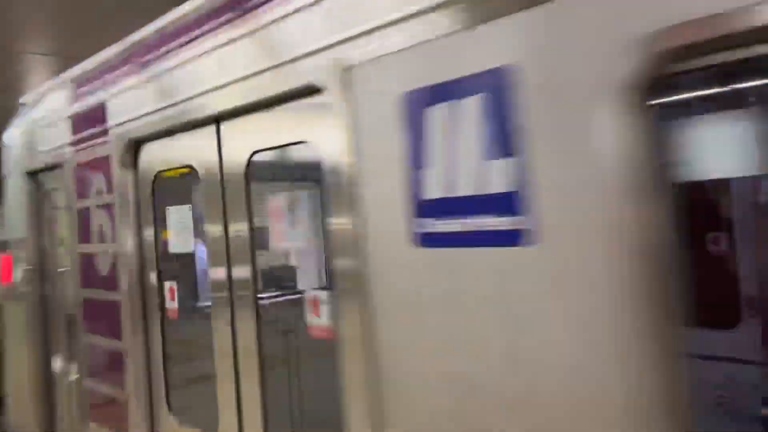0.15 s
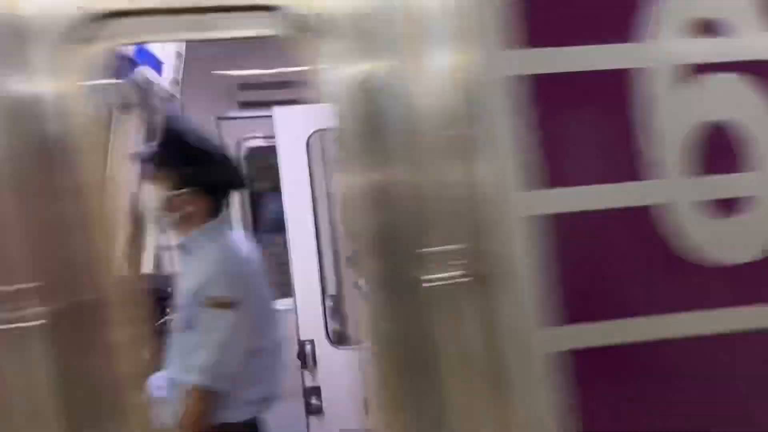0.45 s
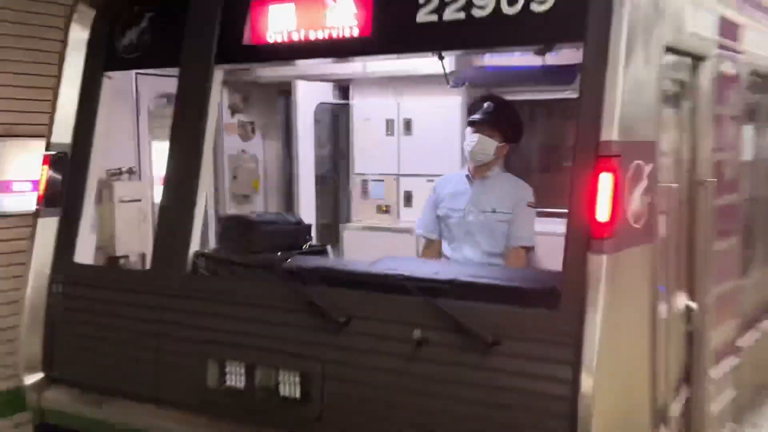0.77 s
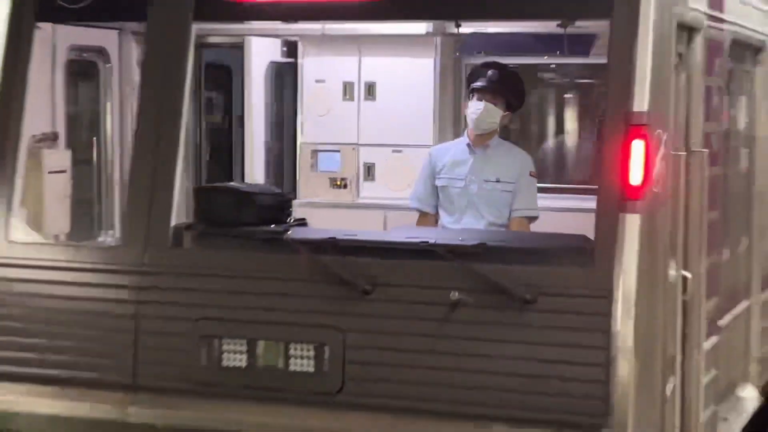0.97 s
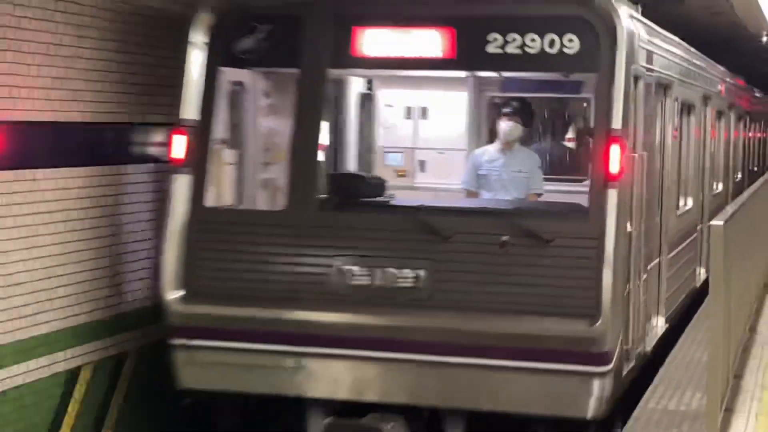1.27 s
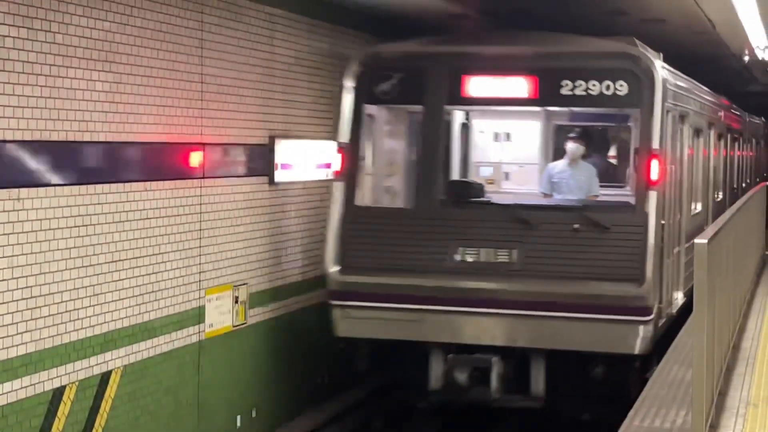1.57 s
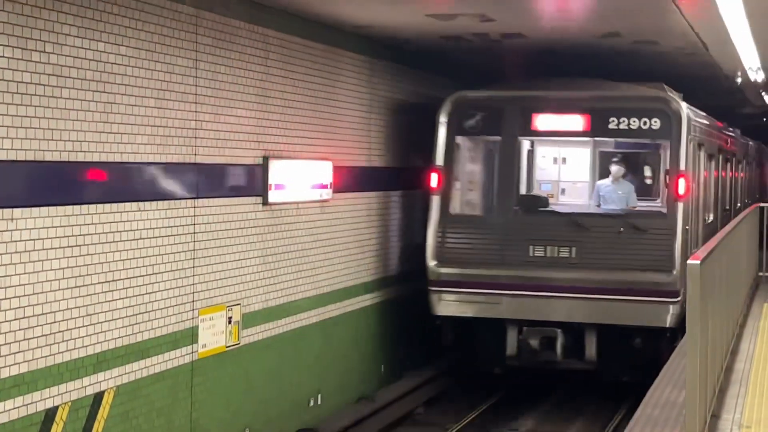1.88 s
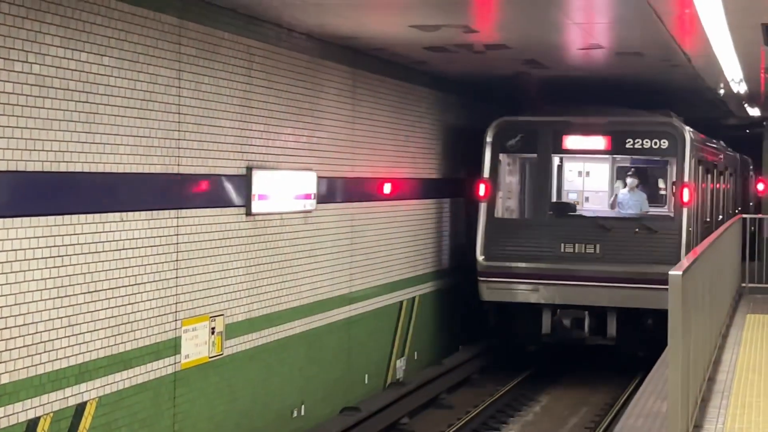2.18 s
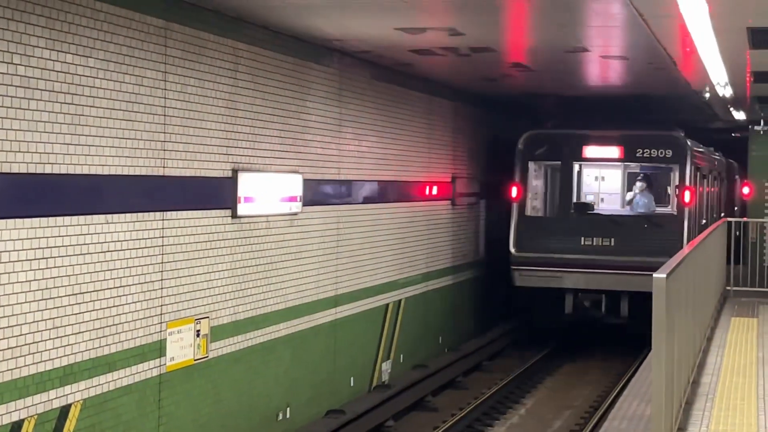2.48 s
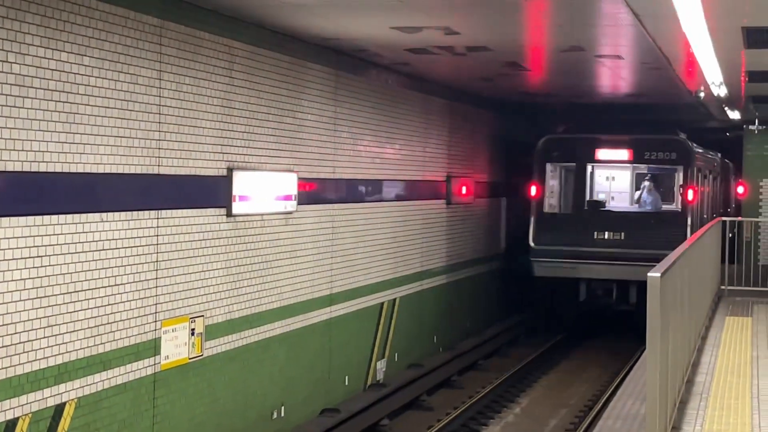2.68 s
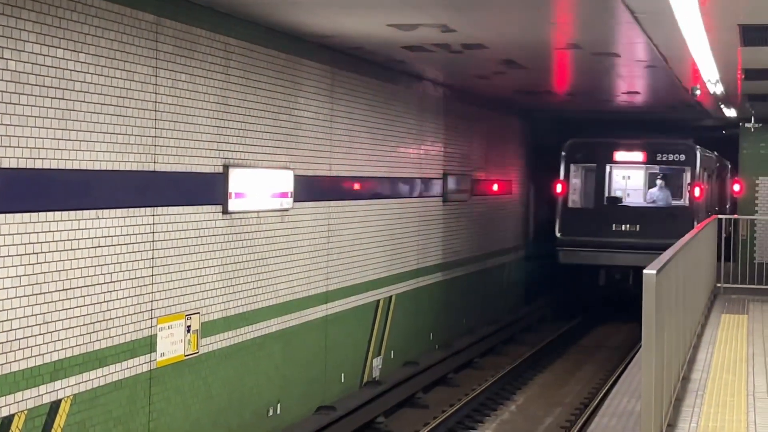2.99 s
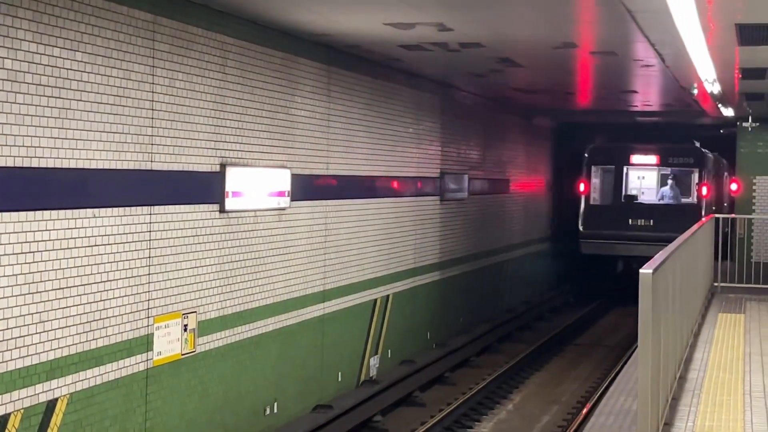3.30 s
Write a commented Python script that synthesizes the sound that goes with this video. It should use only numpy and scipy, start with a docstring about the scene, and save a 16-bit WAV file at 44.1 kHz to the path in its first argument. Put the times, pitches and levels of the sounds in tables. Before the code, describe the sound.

A subway train roars past close by, then recedes into a tunnel as wind buffets the microphone.

```python
"""A wide roar opens the scene: the last car of a subway train rolls past close by in a tiled station.
As it recedes into the tunnel the roar, coloured noise in four registers, narrows and dulls.
Noise-fed resonances make wheels and rails ring, hum and whine in swells, some bending in pitch.
The air dragged behind the train arrives last: bursts of low noise buffet the microphone, with one knock."""
import sys
import numpy as np
from scipy import signal
from scipy.fft import rfft, irfft, next_fast_len
from scipy.io import wavfile
from scipy.ndimage import uniform_filter1d

SR = 44100
rng = np.random.default_rng(int(sys.argv[2]) if len(sys.argv) > 2 else 0)


def bounce(signal):
    """Save signal as a 16-bit WAV file at the path given by the first command-line argument."""
    frames = np.transpose(np.atleast_2d(signal))
    limited = np.clip(frames, -1, 1)
    pcm = np.round(limited * 32767).astype(np.int16)
    wavfile.write(sys.argv[1], SR, pcm)


N = 152145

# Correlation of wind noise at the two ports. Each row: frequency in Hz, left-right likeness (1 = identical).
WIND_LIKENESS = [(55, 1), (130, 0.85), (300, 0.49), (700, 0.61)]
# Gusts of the slipstream, before the trim in scene().
# Each row: middle in seconds, bell spread in seconds, level in dB, lower edge in Hz, upper edge in Hz.
GUSTS = [(1.902, 0.071, -29.5, 54, 140), (2.113, 0.019, -22, 54, 119), (2.187, 0.016, -14, 45.4, 72),
         (2.238, 0.019, -21.5, 54, 100), (2.52, 0.059, -25, 54, 94.5), (2.6, .016, -19.5, 54, 110),
         (2.639, 0.0081, -14.5, 54, 170), (2.688, 0.0074, -22, 54, 90), (2.727, 0.011, -23.5, 54, 90),
         (2.797, 0.018, -12.5, 50, 93), (2.849, 0.012, -12.5, 54, 160), (2.91, 0.0042, -13.5, 160, 260),
         (2.922, 0.0075, -10, 50, 110), (2.95, 0.0085, -14, 60, 160), (2.965, 0.0042, -19, 170, 310),
         (3.002, 0.0051, -7.5, 70, 250), (3.018, .015, -11, 52, 95), (3.063, 0.0089, -17.5, 170, 300),
         (3.079, 0.015, -11.5, 52, 98), (3.107, 0.0074, -18, 130, 320), (3.124, 0.0092, -15, 60, 140),
         (3.142, .007, -16, 160, 327), (3.183, 0.011, -12, 90, 310), (3.207, 0.0095, -16, 60, 210),
         (3.228, 0.015, -23, 54, 150), (3.278, 0.0094, -20, 180, 340), (3.314, .007, -23, 54, 160),
         (3.38, 0.0075, -23.5, 190, 320), (3.043, .12, -17, 52, 84)]
# Resonances of the knock among the gusts. Each row: frequency in Hz, width in Hz, level in dB.
KNOCK_RESONANCES = [(715, 170, -20.5), (1250, 330, -33)]
# Hollow hum of the wheels; this and the next three tables hold before the trim in scene().
# Each row: time in seconds, frequency in Hz, level in dB.
HUM = [(.8, 759.8, -31), (.9, 789.6, -41), (.99, 806.2, -27.5), (1.12, 769.8, -32), (1.24, 789.7, -23.5),
       (1.35, 765.1, -25.5), (1.51, 780, -27), (1.63, 789.8, -34), (1.85, 820, -30), (2, 815.2, -33.5),
       (2.12, 779.8, -27.5), (2.25, 795, -24.5), (2.38, 789.7, -28), (2.51, 790.3, -32.5),
       (2.59, 765, -27.5), (2.73, 764.9, -27.5), (2.86, 780.1, -36), (3.25, 730, -33.5), (3.43, 790.2, -33)]
# A resonance arching above the hum. Each row: time in seconds, frequency in Hz, level in dB.
ARCH = [(1.42, 930, -37), (1.52, 985.4, -30.5), (1.63, 1009, -28.5), (1.76, 985, -29), (1.88, 980.5, -30),
        (2.03, 948, -37)]
# A fainter arch, an octave higher. Each row: time in seconds, frequency in Hz, level in dB.
HIGH_ARCH = [(1.23, 1970, -39), (1.43, 2178, -41), (1.6, 2064, -39), (1.68, 1853, -34.5), (1.78, 1750, -46)]
# Whine of the wheels entering the tunnel, upper partial.
# Each row: time in seconds, frequency in Hz, level in dB.
WHINE = [(2.58, 2352, -43), (2.7, 2279, -46), (2.81, 2158, -36.5), (2.93, 2125, -42.5), (3.06, 2160, -36),
         (3.16, 2200, -42), (3.28, 2282, -43), (3.43, 2332, -48)]
# Swells of wheel and rail ringing, before the trim in scene().
# Each row: middle in seconds, bell spread in seconds, frequency in Hz, width in Hz, level in dB.
RINGS = [(0.39, 0.12, 115, 16, -27), (0.7, 0.23, 262, 55, -31), (0.99, 0.2, 212.4, 12, -27),
         (1.7, 0.66, 213.5, 18.6, -32.5), (1.29, 0.038, 720, 41, -24.5), (1.42, 0.044, 715, 35, -28),
         (1.73, .04, 740, 42, -29), (1.89, .035, 835, 60, -26.5), (2.258, 0.013, 795, 40, -22),
         (2.11, 0.11, 635, 21, -31), (3.02, 0.038, 700, 34, -31.5), (3.17, .06, 645, 24, -28.5),
         (3.24, 0.17, 684, 120, -34), (0.49, 0.14, 1300, 51, -39), (2.094, 0.042, 2180, 120, -39),
         (2.19, 0.05, 1700, 80, -38), (1.46, 1.6, 2690, 44, -48.5), (0.41, .45, 4740, 260, -53),
         (1.3, 0.57, 4740, 110, -55), (3.1, 0.55, 4900, 300, -57.5), (3, 0.34, 3520, 490, -49)]
# Roar of the car alongside, before the changes in RECEDING. Each row: frequency in Hz, dB per octave.
ALONGSIDE = [(22, -64), (38, -41), (58, -28.5), (112, -24.5), (160, -27), (255, -25.5), (390, -28.5),
             (560, -27), (640, -25), (860, -23), (1130, -31), (1550, -30), (1900, -35), (2800, -35),
             (4600, -41), (5800, -45.5), (7200, -44.5), (9800, -53), (11700, -52.5), (14000, -60)]
# Roar of the wheels from down the track, likewise. Each row: frequency in Hz, dB per octave.
DOWN_TRACK = [(22, -69), (38, -39), (58, -28.5), (115, -26.5), (165, -30.5), (300, -29), (390, -29.5),
              (570, -29), (660, -24.5), (820, -25), (1000, -29), (1220, -34.5), (1550, -31), (2150, -32),
              (3100, -36), (4300, -42.5), (4900, -43), (5700, -46), (7300, -43.5), (9800, -52),
              (11700, -53.5), (14000, -57.5)]
# Change of the roar as the train recedes.
# Each row: time in seconds, then rumble, body, clatter and hiss in dB.
RECEDING = [(0, -1, 0, 0, -1), (.35, -1, 0.5, 0, 0), (.7, 1, 1, .5, 1), (1.05, 1, 2.5, -0.5, 0),
            (1.5, -2, 0, -1, -0.5), (1.95, 0, -1, -2, -2.5), (2.25, -2, -0.5, -2.5, -3),
            (2.4, -2, -2.5, -4, -5), (2.7, 0, -1.5, -3.5, -5.5), (3.05, 1, -5.5, -7, -7),
            (3.45, -4, -4.5, -7.5, -9)]
# Centres of those four registers: frequencies in Hz.
REGISTERS_HZ = [150, 600, 1800, 6000]
# Stereo image at the microphone pair. Each row: frequency in Hz, likeness alongside, likeness down the
# track, left-minus-right level in dB alongside, left-minus-right level in dB down the track.
IMAGE = [(55, 0.95, 0.98, 1, 1), (130, 0.96, 0.94, 0, 0), (336, 0.83, 0.9, 0.5, .5),
         (640, 0.26, 0.65, -0.5, 0.5), (1220, 0.33, 0.48, -1, 1), (1600, 0.22, 0.56, 0.5, -6),
         (2240, 0.35, 0.89, 2.5, -2.5), (4300, 0.35, 1, 3.5, -0.5), (6030, 0.2, 0.89, 0.5, 0.5),
         (7240, 1, 1, 1, 0), (8500, .99, 1, 3, 2.5), (10500, 1, 1, 0, -0.5), (14000, 0.99, 0.96, 0, 0)]
# Phase between the two ports. Each row: frequency in Hz, lead of the left in radians.
PORT_PHASE = [(20, 0), (1150, 0), (1350, -.9), (1550, -3.1), (1800, -5.8), (2600, -6.28), (4800, -6.28),
              (6500, -7.2), (7300, -7.9), (8100, -9.2), (8900, -9.6), (10200, -11), (11500, -12.3),
              (13000, -13.1), (14200, -14.6)]

WIND_SLOPE, WIND_SMOOTH_S = 3.17, .016  # steepness above the upper edge; span over which level holds
KNOCK_S, KNOCK_SPREAD_S = 3.022, 0.0042
WHINE_LOW_RATIO, WHINE_LOW_DB = .638, -1.5  # lower partial relative to the upper
GLIDE_FADE_S, GLIDE_STEADY_S = 0.052, .07  # bell spread of the end fades; span over which level holds
TAIL_PASSES_S, HANDOVER_S = 0.807, 0.077  # the end of the train goes by; time scale of the change
FENCE_ECHO_S, FENCE_ECHO_DB = 0.00136, -25.5  # reflection off the platform fence
WALL_ECHO_S, WALL_ECHO_DB = 0.0076, -9.5  # decay time and level of scatter, before its filter
FLUTTER_HZ, FLUTTER_DB, JOLT_DB = 18, .5, 0.24  # unevenness: rate; spread per register; shared spread

T = np.arange(N) / SR
SIZE = next_fast_len(N, True)
HZ = np.maximum(np.arange(SIZE // 2 + 1) * SR / SIZE, 1)


def from_db(db):
    """The decibel law: 20 dB is a tenfold amplitude."""
    return 10 ** (np.asarray(db) / 20)


def over_log_hz(hz, values):
    """Interpolation over log frequency, where equal ratios are equal steps."""
    return np.interp(np.log(HZ), np.log(hz), values)


def over_hz(points, axis=1):
    """One table column spread over log frequency."""
    table = np.array(points)
    return over_log_hz(table[:, 0], table[:, axis])


def to_time(spectrum):
    """Inverse Fourier transform: a spectrum becomes samples."""
    return irfft(spectrum, SIZE)[..., :N]


def noise_pair(likeness, pan_db=0, phase=0):
    """Mid-side mixing: the share of common noise sets the likeness of two channels."""
    mid, side = rfft(rng.standard_normal((2, SIZE)))
    alike = np.clip(likeness, -.995, .995)
    sign = np.array([[1], [-1]])  # left, right
    pair = np.sqrt((1 + alike) / 2) * mid + sign * np.sqrt((1 - alike) / 2) * side
    return pair * from_db(sign * pan_db / 2) * np.exp(1j * sign * phase / 2)


def track_noise():
    """Directional cues: white noise with the image of a source down the track."""
    return noise_pair(over_hz(IMAGE, axis=2), over_hz(IMAGE, axis=4), over_hz(PORT_PHASE))


def evened(x, span_s):
    """Level normalization: rms is held near 1 over a span while faster flutter survives."""
    power = uniform_filter1d(np.mean(x ** 2, axis=0), max(int(span_s * SR), 1))
    return x / np.sqrt(np.maximum(power, 0) + 1e-20)


def swell(middle_s, spread_s):
    """Gaussian envelope: a bell-shaped rise and fall."""
    return np.exp(-.5 * np.minimum(((T - middle_s) / spread_s) ** 2, 100))


def ringing_noise(hz, width_hz):
    """Forced resonance: noise keeps a narrow mode sounding, at rms near 1."""
    resonance = 1 / (1 + 1j * (HZ - hz) / width_hz * np.sqrt(2)) ** 2
    return evened(to_time(track_noise() * resonance), span_s=0.18)


def slipstream():
    """Turbulent pressure: long lumps of air rumble, big ones thud, small ones knock higher in pitch."""
    out = 0
    likeness = over_hz(WIND_LIKENESS)
    for middle_s, spread_s, db, low_hz, edge_hz in GUSTS:
        below = 1 + (low_hz / HZ) ** 8
        above = 1 + (HZ / edge_hz) ** (2 * WIND_SLOPE)
        colour = 1 / np.sqrt(below * above)
        lumps = evened(to_time(noise_pair(likeness) * colour), span_s=WIND_SMOOTH_S)
        out = out + from_db(db) * swell(middle_s, spread_s) * lumps
    return out


def knock():
    """Broad resonances under a brief envelope: one short dull knock."""
    body = sum(from_db(db) * ringing_noise(hz, width_hz) for hz, width_hz, db in KNOCK_RESONANCES)
    return swell(KNOCK_S, KNOCK_SPREAD_S) * body


def gliding(curve, width_hz, ratio=1):
    """Frequency shifting: a noise-fed resonance follows a pitch and level curve and fades past its ends."""
    s, hz, db = np.transpose(curve)
    centre_hz = ratio * hz.mean()
    shift_hz = ratio * np.interp(T, s, hz) - centre_hz
    turn = 2 * np.pi * np.cumsum(shift_hz) / SR
    analytic = signal.hilbert(ringing_noise(centre_hz, width_hz), SIZE)[:, :N]
    ring = (analytic * np.exp(1j * turn)).real
    end_fades = swell(np.clip(T, s[0], s[-1]), GLIDE_FADE_S)  # 1 within the curve
    return from_db(np.interp(T, s, db)) * end_fades * evened(ring, span_s=GLIDE_STEADY_S)


def wheel_singing():
    """Gliding resonance: the wheels' hollow hum, the arches above it and a late whine of two partials."""
    upper = gliding(WHINE, width_hz=120)
    lower = from_db(WHINE_LOW_DB) * gliding(WHINE, width_hz=49, ratio=WHINE_LOW_RATIO)
    arches = gliding(ARCH, width_hz=75) + gliding(HIGH_ARCH, width_hz=130)
    return gliding(HUM, width_hz=52.5) + arches + upper + lower


def wheel_ringing():
    """Roughness excitation: rail roughness drives narrow wheel and rail modes that swell and die away."""
    out = 0
    for middle_s, spread_s, hz, width_hz, db in RINGS:
        out = out + from_db(db) * swell(middle_s, spread_s) * ringing_noise(hz, width_hz)
    return out


def per_octave(points):
    """Constant-ratio bands: the gain that gives white noise these octave levels."""
    return from_db(over_hz(points)) * np.sqrt(SR / 2 / HZ / np.log(2))


def drift(rate_hz):
    """Low-passed noise: a slow random wander with standard deviation 1."""
    slow = to_time(rfft(rng.standard_normal(SIZE)) * HZ / (HZ + 2) / (1 + (HZ / rate_hz) ** 2))
    return slow / slow.std()


def walls():
    """Early reflection: direct sound plus dense midrange scatter off tiled walls, at mean power near 1."""
    decay = np.exp(-np.minimum(T / WALL_ECHO_S, 50))
    scatter = rng.standard_normal(N) * decay * (T > .003)
    gain = from_db(WALL_ECHO_DB) * HZ / (HZ + 900) / (1 + (HZ / 4500) ** 2)
    response = 1 + gain * rfft(scatter / np.linalg.norm(scatter), SIZE)
    return response / np.sqrt(1 + gain ** 2)


def fence():
    """Comb filtering: a faint, dulled, delayed copy from the platform fence joins the direct sound."""
    delay = np.exp(-2j * np.pi * HZ * FENCE_ECHO_S)
    return 1 + from_db(FENCE_ECHO_DB) * delay / (1 + (HZ / 4000) ** 2)


def rolling_roar():
    """Equal-power crossfade: a wide roar alongside yields to a narrower one down the track that dulls."""
    near_noise = noise_pair(over_hz(IMAGE, axis=1), over_hz(IMAGE, axis=3), over_hz(PORT_PHASE))
    near = per_octave(ALONGSIDE) * walls() * near_noise
    far = per_octave(DOWN_TRACK) * walls() * fence() * track_noise()
    gone = .5 + .5 * np.tanh((T - TAIL_PASSES_S) / HANDOVER_S)
    s, *levels_db = np.transpose(RECEDING)
    jolts_db = JOLT_DB * drift(FLUTTER_HZ)
    out = 0
    for level_db, pick in zip(levels_db, np.eye(len(REGISTERS_HZ))):
        band = over_log_hz(REGISTERS_HZ, pick)  # overlapping bands that sum to 1
        gain = from_db(np.interp(T, s, level_db) + jolts_db + FLUTTER_DB * drift(FLUTTER_HZ))
        mix = np.sqrt(1 - gone) * to_time(near * band) + np.sqrt(gone) * to_time(far * band)
        out = out + gain * mix
    return out


def scene():
    """Superposition: the wind, the knock and the train add as pressures."""
    trimmed = slipstream() + wheel_singing() + wheel_ringing()
    return from_db(-0.5) * trimmed + knock() + rolling_roar()


def record(dry):
    """Band limiting: peaks are clipped below full scale, both ends eased and the top cut."""
    ease = np.minimum(np.minimum(T, T[-1] - T) / .002, 1)
    top_cut = signal.cheby2(16, 60, 15000, fs=SR, output="sos")  # 60 dB down from 15 kHz
    return signal.sosfilt(top_cut, ease * np.clip(dry, -.95, .95))


dry = scene()
out = record(dry)
bounce(out)
```